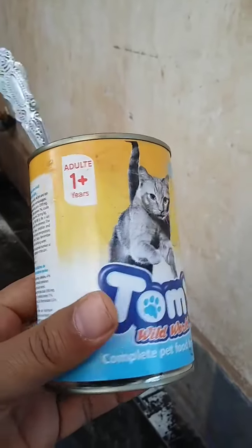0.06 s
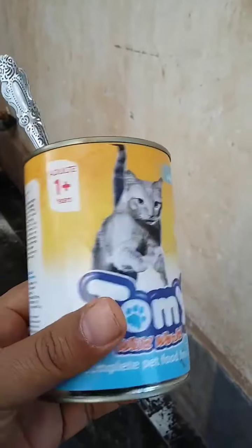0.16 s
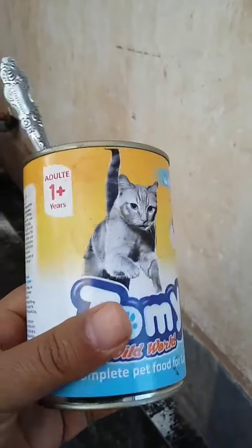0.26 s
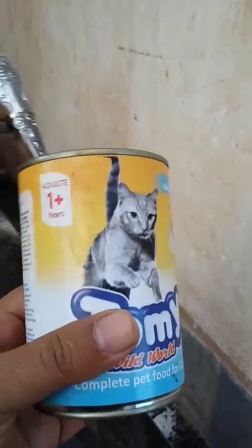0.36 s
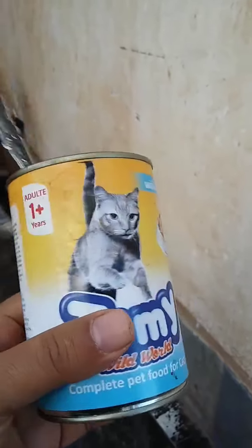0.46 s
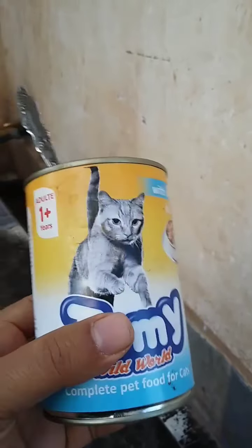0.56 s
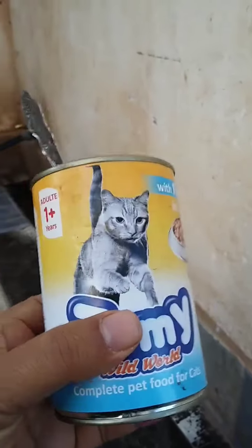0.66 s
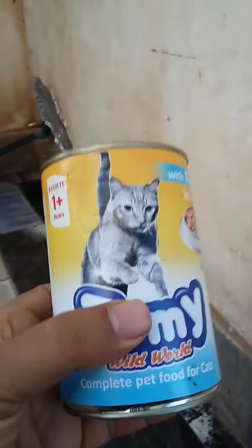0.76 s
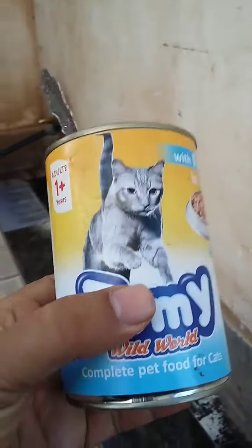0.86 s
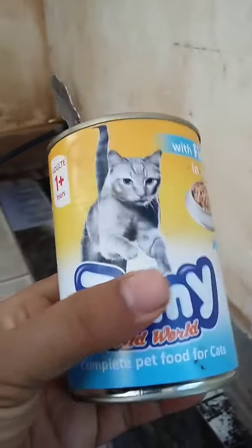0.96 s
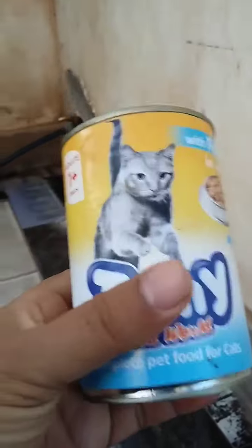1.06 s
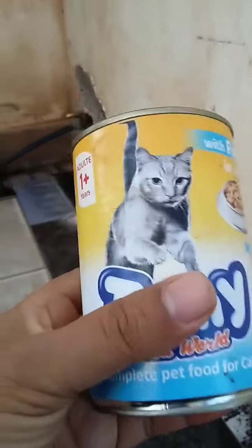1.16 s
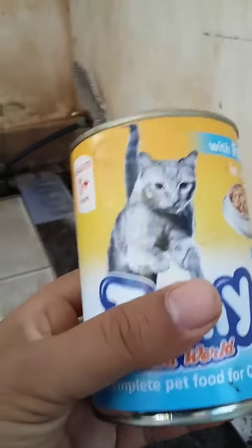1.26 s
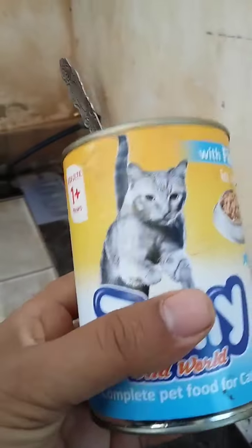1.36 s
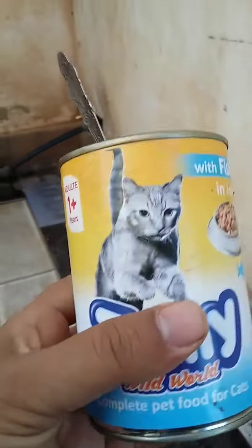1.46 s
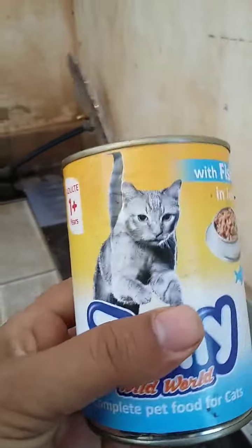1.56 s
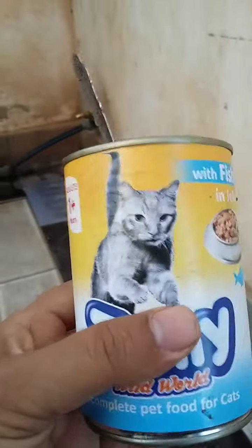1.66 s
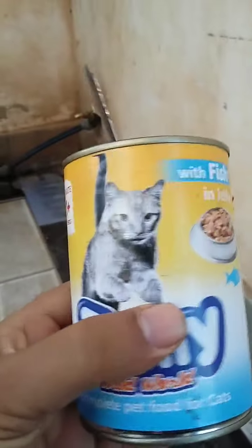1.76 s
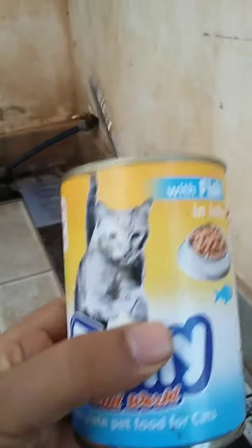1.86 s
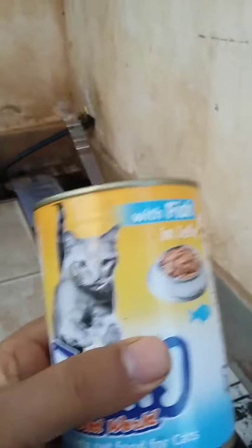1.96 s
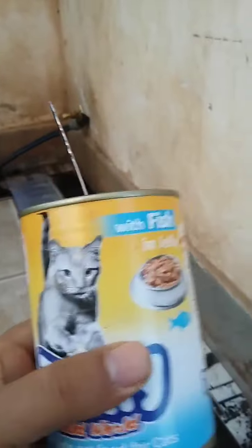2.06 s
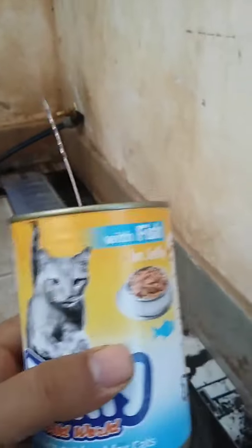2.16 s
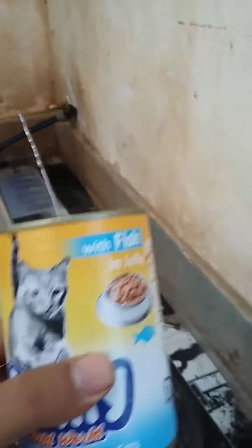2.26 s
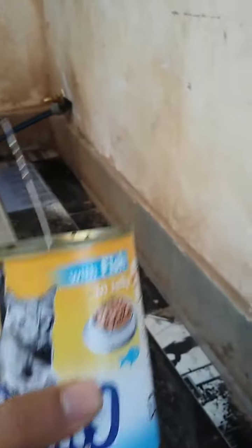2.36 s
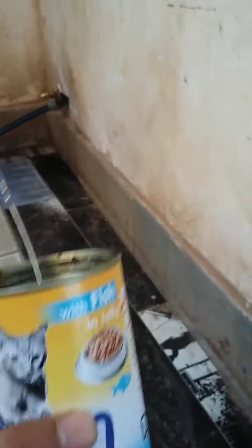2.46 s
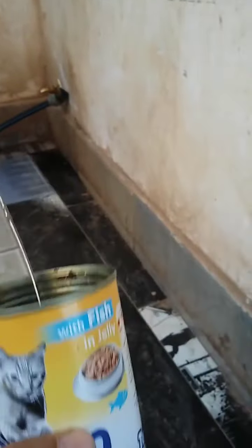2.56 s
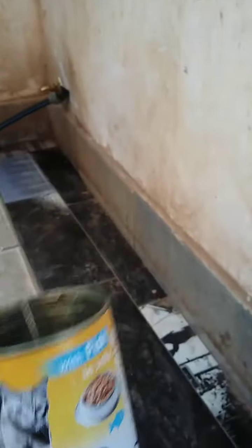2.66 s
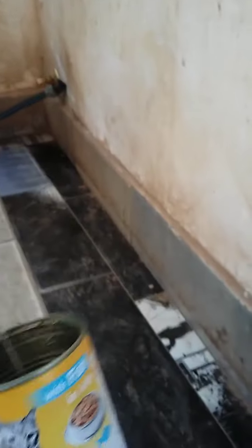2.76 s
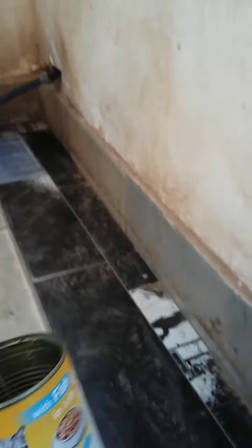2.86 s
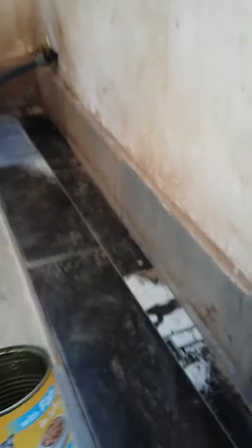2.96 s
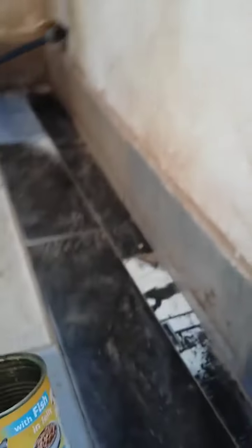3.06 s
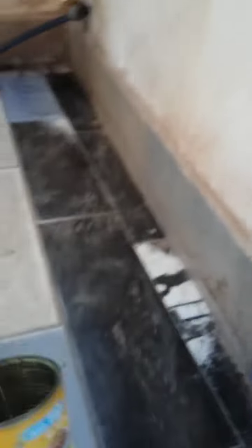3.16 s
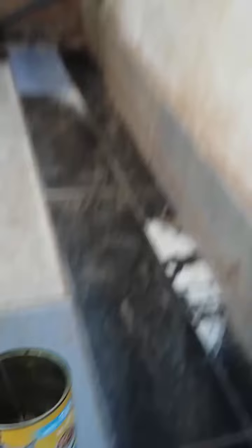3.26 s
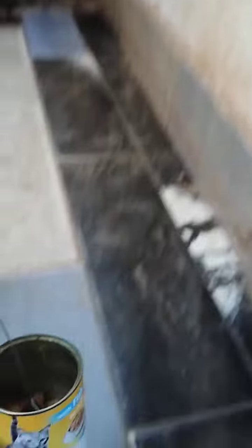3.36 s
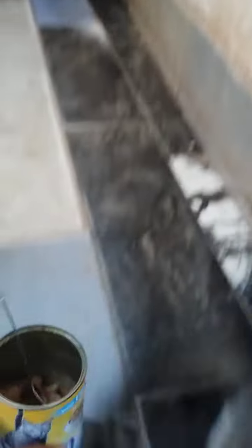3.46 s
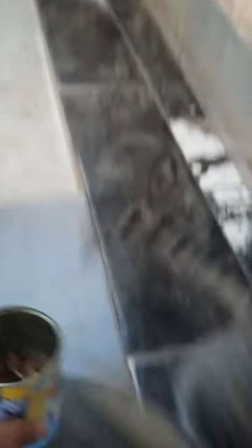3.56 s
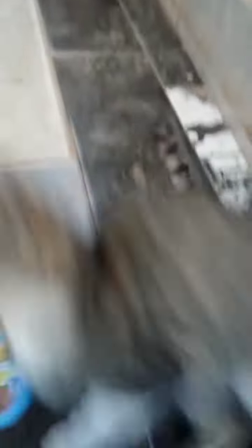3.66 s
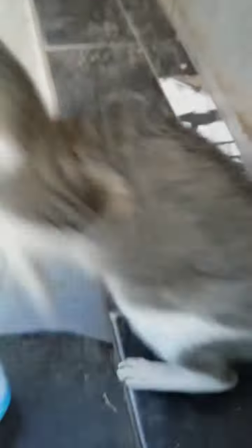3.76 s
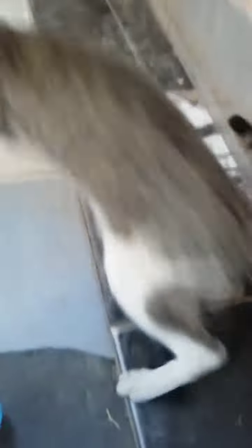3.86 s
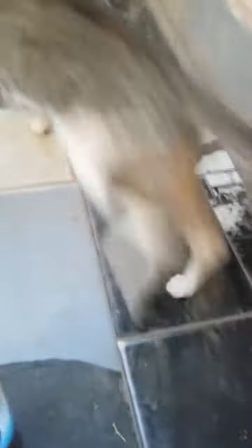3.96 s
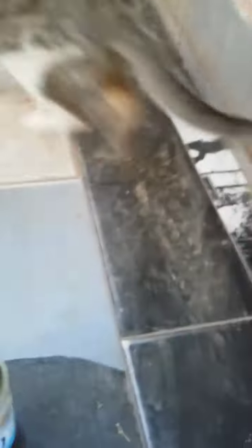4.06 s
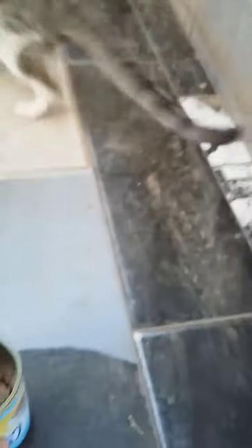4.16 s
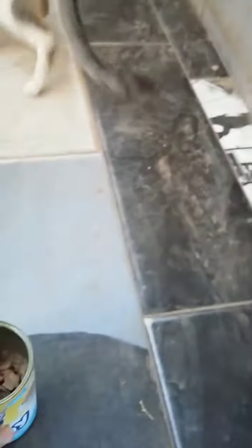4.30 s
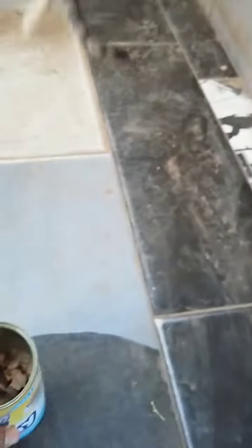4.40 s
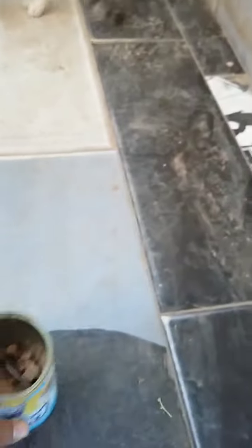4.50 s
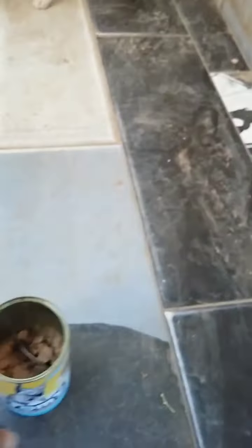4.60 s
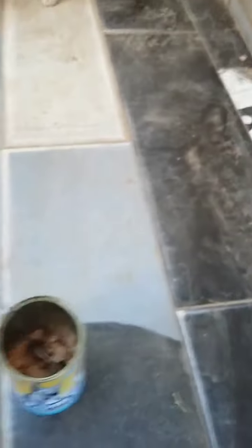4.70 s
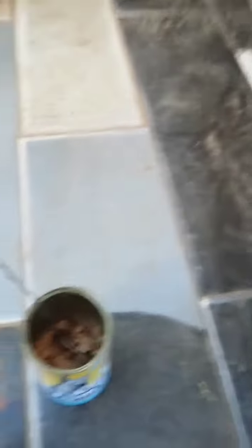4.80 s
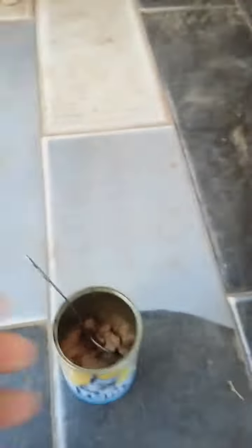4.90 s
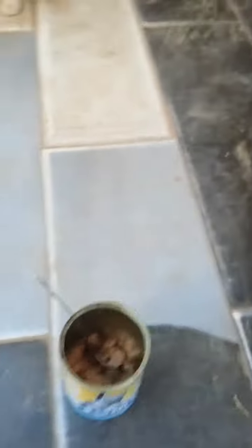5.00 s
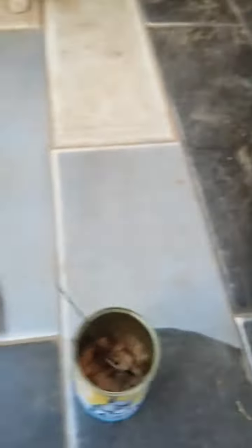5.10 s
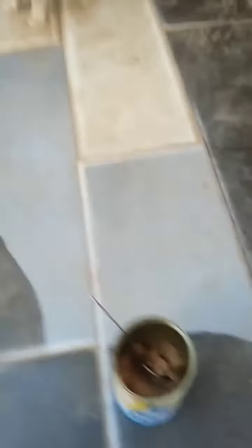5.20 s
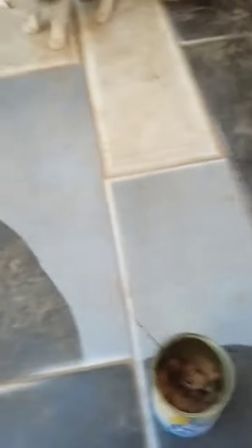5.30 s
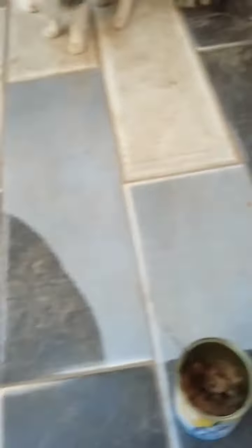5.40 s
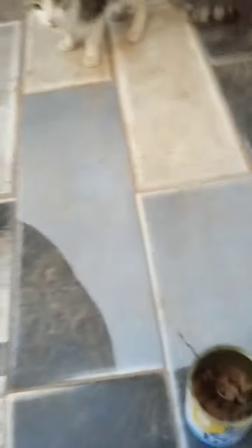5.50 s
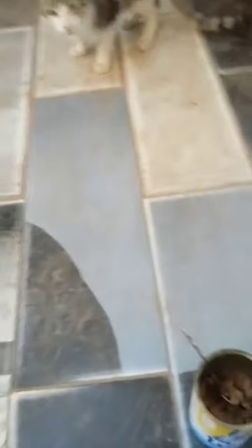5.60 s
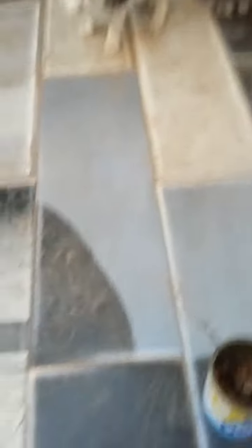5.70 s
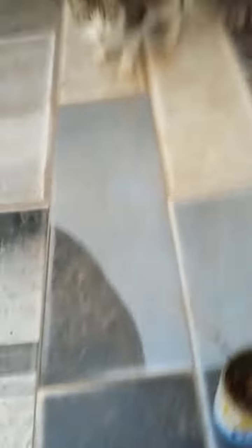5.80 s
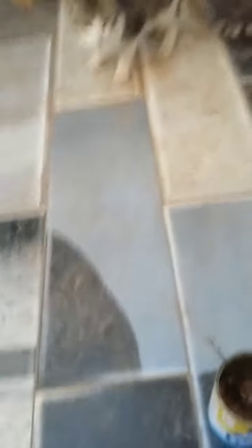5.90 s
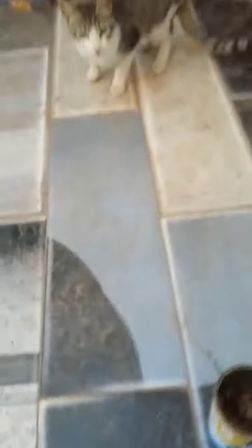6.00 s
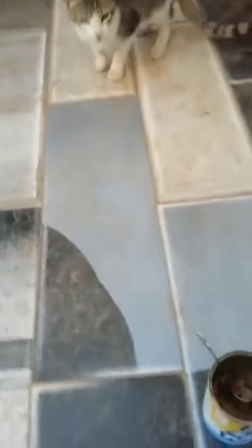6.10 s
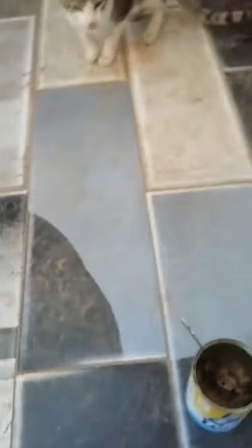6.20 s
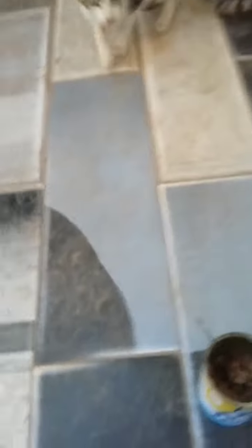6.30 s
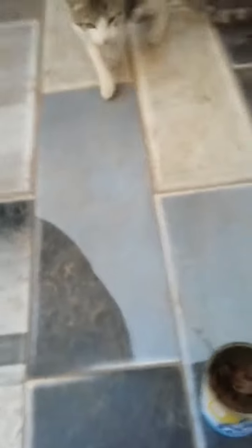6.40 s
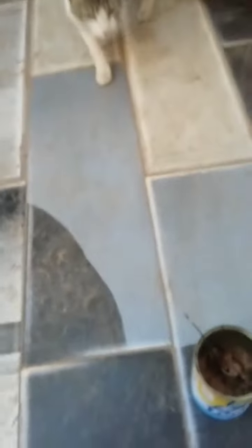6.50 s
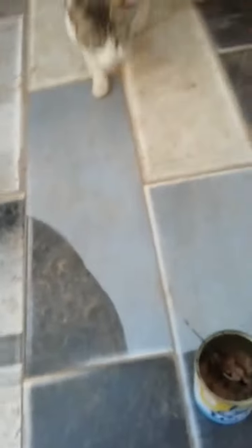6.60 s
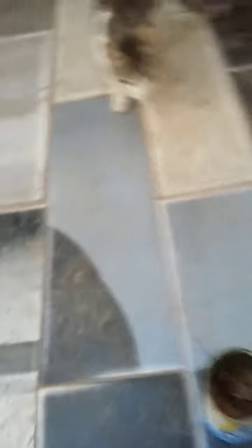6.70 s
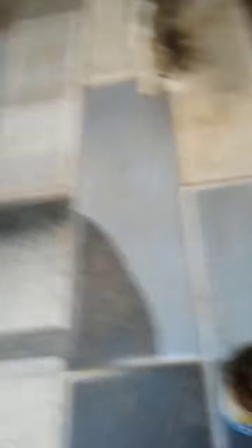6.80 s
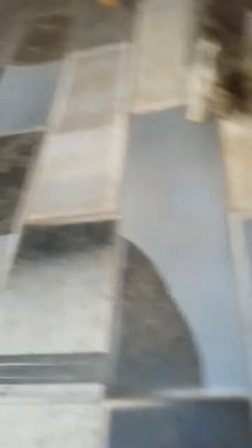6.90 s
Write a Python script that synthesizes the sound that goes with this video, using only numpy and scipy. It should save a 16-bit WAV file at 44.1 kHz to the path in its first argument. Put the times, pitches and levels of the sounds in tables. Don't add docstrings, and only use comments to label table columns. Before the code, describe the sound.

Songbirds whistle faintly over a low neighbourhood hum, then a spoon knocks in a food can, which lands on tile and scrapes briefly amid shuffling steps.

```python
import sys
import numpy as np
from scipy import signal
from scipy.fft import rfft, irfft, next_fast_len
from scipy.io import wavfile
from scipy.ndimage import uniform_filter1d, minimum_filter1d

SR = 44100
rng = np.random.default_rng(int(sys.argv[2]) if len(sys.argv) > 2 else 0)


def ratio(d):
    e = np.asarray(d, float) / 20
    return 10 ** e


def waveform_to_disk(signal):
    frames = np.transpose(np.atleast_2d(signal))
    scaled = np.clip(frames, -1, 1) * 32767
    samples = np.round(scaled).astype(np.int16)
    wavfile.write(sys.argv[1], SR, samples)


N = 306439

# time in seconds, drone level in dB.
DRONE_LEVEL = [(0.0, -56), (0.81, -54), (1.14, -57), (2.67, -57.5), (3.05, -53.5), (4.64, -53.5),
               (5.02, -53.5), (6.36, -53.5), (6.94, -52.5)]
# frequency in Hz, density in dB per Hz.
DRONE_SPECTRUM = [(12, -46), (20, -25), (22, -26), (48, 1), (65, 2), (134, 4.5), (157, -4), (195, -10),
                  (245, -15), (500, -22.5), (650, -65), (1100, -120)]
# frequency in Hz, density in dB per Hz.
WASH_SPECTRUM = [(120, -27), (200, 1), (294, -2.5), (538, -5), (836, -3.5), (2130, -12), (2380, -15),
                 (3130, -14), (3970, -14), (5130, -30.5), (7270, -35.5), (7970, -23.5), (8580, -37),
                 (11500, -34.5), (16000, -48)]
# frequency in Hz, width in Hz, level in dB over the drone.
HUM_MODES = [(79.9, 3.8, -6), (165.14, 10.5, -3.5), (233, 1.7, -23.5), (497, 5.4, -16)]
# time in seconds, level in dB.
HUM_SWELL_LEVEL = [(0.0, -73.5), (0.54, -69), (0.85, -58.5), (1.02, -66.5), (1.2, -69.5), (3.54, -61.5),
                   (3.86, -56.5), (4.7, -58), (5.28, -63), (6.94, -64.5)]
# frequency in Hz, left-right likeness from 0 to 1.
SIDE_LIKENESS = [(60, 1), (180, 0.88), (550, 0.92), (1650, 0.02), (4970, 0.012), (15000, 0.13)]
# frequency in Hz, left minus right in dB.
NOISE_LEAN = [(60, 1), (180, -2), (550, 0), (1650, -3.5), (4970, 2), (15000, -1.5)]
# start, rise, hold and fall in seconds, level in dB.
MURMUR_STROKES = [
    (6.862, .012, 0.04, .015, -56),
    (6.94, .015, .02, .02, -63),
]
# start and length in seconds, first and last pitch in Hz,
# level in dB.
HIGH_SONG = [(0.0081, 0.024, 3200, 3090, -72), (0.04, 0.045, 3460, 3800, -78),
             (0.079, 0.051, 3890, 3860, -73), (.085, 0.033, 3750, 3600, -77),
             (0.12, 0.044, 3600, 3420, -83), (0.217, 0.042, 3050, 2890, -74),
             (0.243, 0.064, 2940, 3210, -71), (0.275, 0.032, 3000, 2940, -68),
             (0.325, 0.064, 3330, 3150, -70.5), (0.377, 0.05, 3050, 2950, -74),
             (0.538, 0.056, 2540, 2600, -74), (0.624, 0.061, 2640, 2730, -73),
             (0.76, 0.097, 5080, 5040, -80), (0.757, 0.058, 4700, 4550, -74),
             (0.778, 0.02, 4020, 3920, -63), (0.808, .025, 3420, 3400, -67),
             (0.823, 0.02, 4100, 3920, -68), (.84, 0.038, 3100, 2950, -73),
             (0.858, 0.059, 3850, 3530, -74), (1.129, 0.046, 3600, 3370, -70),
             (1.162, 0.056, 3050, 3230, -70), (1.176, 0.037, 3570, 3330, -70),
             (1.231, 0.062, 3500, 3440, -72.5), (1.368, 0.096, 3560, 2540, -67.5),
             (1.382, 0.037, 3340, 3220, -64), (1.465, 0.22, 2550, 3066, -69.5),
             (1.504, 0.14, 3240, 3230, -75), (1.687, .05, 3076, 3040, -77),
             (1.858, 0.07, 4140, 4300, -70.5), (1.95, 0.06, 4600, 4750, -83),
             (2.017, 0.072, 4540, 4200, -71),
             (2.217, 0.039, 3550, 3670, -73), (2.251, 0.03, 3520, 3250, -64.5),
                  (2.28, 0.053, 3270, 3140, -66.5), (2.31, .03, 3180, 3330, -69),
                  (2.34, 0.052, 3390, 3750, -70), (2.406, 0.077, 3780, 3660, -63.5),
                  (2.49, 0.064, 3620, 3700, -70.5), (2.606, 0.046, 3040, 2940, -65),
                  (2.645, 0.057, 3340, 3200, -68), (2.668, 0.046, 3750, 3800, -75),
                  (2.785, 0.049, 3110, 3010, -59.5), (2.85, 0.043, 3000, 2900, -67),
                  (2.937, .03, 3300, 3230, -71), (2.96, 0.042, 4050, 4200, -68),
                  (3.055, 0.04, 3750, 3810, -67), (3.103, 0.037, 4050, 4240, -71),
                  (3.247, 0.051, 3260, 3150, -63), (4.143, 0.091, 4310, 4110, -67.5)]
# start and length in seconds, first and last pitch in Hz, level in dB.
FAR_SONG = [
    (0.179, 0.066, 2110, 2020, -63.5),
    (0.261, 0.071, 2014, 1930, -71),
    (0.38, 0.12, 1956, 2010, -70.5),
    (0.474, 0.12, 2035, 2100, -68.5),
    (1.069, 0.45, 1792, 1735, -69.5),
    (1.489, 0.18, 1750, 1710, -73),
    (2.3, 0.4, 2040, 2040, -80),
    (2.601, 0.061, 2050, 2060, -72),
]
# start, rise, hold and fall in seconds, level in dB.
CHORUS_SWELLS = [
    (.1, .5, 0.41, .7, -72),
    (1.5, .35, .05, .5, -76),
    (2.7, 0.65, 0.47, 0.49, -58),
]
# start, rise, hold and fall in seconds, level in dB.
BUZZ_STROKES = [
    (.765, 0.027, 0.047, 0.046, -78),
]
# frequency in Hz, density in dB per Hz.
RUB_SPECTRUM = [(180, -38.5), (310, -2.5), (453, -3.5), (872, -8.5), (1630, -8), (1830, -5), (2920, -1),
                (3600, -3), (4420, -8), (5100, -14), (5700, -21), (9000, -32.5), (11700, -71),
                (19800, -120)]
# frequency in Hz, density in dB per Hz.
SCUFF_SPECTRUM = [(2060, -31), (3000, -24), (3900, 2), (4770, -8), (5390, -10.5), (6620, -15.5),
                  (8340, -19), (12000, -16), (15300, -24), (16000, -50)]
# start, rise, hold and fall in seconds, level in dB.
RUB_STROKES = [(3.33, 0.15, 0.033, 0.1, -55), (3.43, .08, .04, 0.102, -55.5),
               (3.55, 0.18, 0.19, 0.0075, -51), (3.83, 0.13, 0.0052, 0.086, -48),
               (4.04, 0.051, 0.011, 0.035, -60), (4.14, 0.066, 0.39, 0.062, -64.5),
               (4.44, 0.052, 0.16, 0.066, -52.5), (4.86, 0.2, 0.024, 0.062, -46.5),
               (4.9, 0.035, 0.14, 0.057, -50), (5.18, 0.14, 0.025, 0.8, -54),
               (5.76, 0.045, 0.13, 0.18, -53.5), (6.05, 0.084, 0.13, .03, -63),
               (6.255, 0.038, 0.0078, 0.024, -55.5), (6.5, 0.26, 0.23, 0.041, -61.5),
               (6.77, 0.0086, 0.0054, 0.048, -51.5)]
# start, rise, hold and fall in seconds, level in dB.
SCUFF_STROKES = [(3.68, .3, 0.075, .03, -73.5), (3.8, .03, .05, 0.19, -72), (4.46, 0.066, .1, .05, -70),
                 (4.6, 0.011, 0.072, 0.033, -51.5), (4.76, .05, 0.13, 0.29, -70),
                 (5.721, 0.002, 0.0034, 0.0066, -46.5), (5.77, 0.02, 0.045, .05, -72.5),
                 (5.893, 0.015, 0.0056, 0.016, -53), (5.997, 0.002, 0.0039, 0.005, -49.5),
                 (6.005, 0.012, 0.094, 0.018, -62), (6.165, 0.026, 0.0039, 0.0037, -55.5),
                 (6.235, 0.031, 0.039, 0.025, -59.5), (6.57, 0.23, 0.019, 0.076, -68),
                 (6.76, 0.11, 0.058, 0.094, -68.5)]
# start, rise, hold and fall in seconds, level in dB.
SLIDE_STROKES = [
    (4.835, 0.068, 0.1, 0.15, -42.5),
    (5.0, 0.059, 0.018, 0.035, -54),
    (6.775, 0.025, 0.0063, 0.0099, -49),
    (6.87, .03, 0.08, .05, -64),
]
# frequency in Hz, density in dB per Hz.
SLIDE_SPECTRUM = [(450, -40), (650, 1.5), (900, 2.5), (1300, 1), (2000, -5), (3200, -6), (4000, -23)]
# time in seconds, peak in dB,
# pitch in Hz.
LOW_THUDS = [(2.042, -33, 150), (3.7114, -19, 190), (3.733, -25, 170), (3.78, -26.5, 159),
             (3.787, -27.5, 230), (3.813, -26, 190), (3.842, -31, 170), (4.044, -26, 127),
             (6.162, -24.5, 96), (6.19, -25, 72.7), (6.701, -31.5, 264), (6.781, -24, 77.4)]
# time in seconds, peak in dB, left minus right in dB, colour in Hz, T60 in seconds.
GRIT_TICKS = [(0.4726, -19.5, -9, 2530, 0.073), (1.355, -30, -9, 1800, .02), (1.572, -31, -7, 2100, 0.022),
              (1.774, -29, -7, 3060, 0.025), (1.839, -30, -13, 3300, .02), (2.211, -23.5, -7, 2600, 0.013),
              (2.797, -24, -7, 2300, 0.016), (2.8844, -22, 8, 2400, 0.016), (2.96, -38, 0, 2900, .02),
              (3.694, -20.5, -18, 3000, 0.28), (3.708, -26, -5, 4500, .012), (3.726, -19, -10, 3600, 0.045),
              (3.748, -22, 8, 5300, .06), (4.134, -28, -3, 2890, 0.031), (4.505, -31, -4, 6500, .02),
              (4.5427, -18, -15, 3500, 0.014), (4.57, -13, 3, 4700, 0.02), (4.586, -30, 0, 6000, .012),
              (5.7214, -22, -9, 3300, 0.014), (5.895, -20.5, -13, 2900, 0.013),
              (5.948, -24, 10, 4960, 0.11), (5.995, -20, -9, 3300, 0.022), (6.1625, -20, 5, 4070, 0.017),
              (6.204, -31, 5, 4070, 0.012), (6.255, -24, 0, 3970, .05), (6.445, -27, 0, 1200, 0.014),
              (6.528, -10, -3, 3580, 0.009), (6.684, -39, 0, 6500, 0.011), (6.764, -21, -8, 3800, .02),
              (6.773, -18, -7, 2900, 0.028), (6.778, -18, -8, 2200, 0.014), (6.79, -32, 2, 6500, .015),
              (6.803, -23, 6, 6000, .015), (6.818, -33, 0, 4500, .015)]
# time in seconds, peak in dB, left minus right in dB, top in Hz.
CLEAN_SNAPS = [
    (6.1852, -15, -19, 3800),
    (6.41, -39, -8, 1190),
    (6.6996, -29, -9, 1320),
    (6.7558, -34, -13, 900),
]
# time in seconds, peak in dB, lowest frequency in Hz, T60 in seconds.
HARD_EDGES = [
    (3.775, -44, 6000, .03),
    (3.787, -58, 6000, .04),
    (4.3995, -58, 5500, .025),
    (6.1845, -50, 8500, .012),
]
# start, rise, hold and fall in seconds, level in dB.
DRAG_STROKES = [
    (4.595, 0.0096, 0.094, 0.0099, -52.5),
    (4.622, 0.051, 0.03, 0.032, -46),
]
# frequency in Hz, width in Hz, left in dB, right in dB.
DRAG_MODES = [(510, 42, -8, -3), (923, 87, 2.5, 7), (1885, 120, -1.5, 3), (2240, 95, -5, 1),
              (2710, 180, -24, 6.5), (3130, 190, -6, 5), (4070, 23, 5, -25), (4430, 150, -7, 2),
              (4820, 76, 5.5, 4.5), (5080, 62, -0.5, -21), (6700, 1100, -34, -2), (13500, 17000, -20, -7)]
# time in seconds, peak in dB.
SPOON_HITS = [
    (3.7750, -17),
    (3.7762, -14.5),
    (3.7780, -19.5),
    (3.7825, -28),
    (3.7865, -25.5),
    (3.7892, -21),
    (3.7925, -39),
    (3.8005, -41),
    (3.816, -40),
    (3.9144, -48.5),
]
# frequency in Hz, level in dB, T60 in seconds.
WALL_MODES = [(246.6, -30.5, 0.35), (484, -23.5, 0.033), (765, -10.5, 0.014), (1460, -12, 0.036),
              (2100, -14, 0.031), (2810, -21, 0.032), (2780, 3, 0.026), (3050, -3, 0.012),
              (3250, -2.5, 0.018), (3400, -21, 0.034), (3780, -27, 0.024), (4370, -32, 0.018),
              (4660, -27, 0.03), (4750, -2.5, 0.017), (5000, -4.5, 0.016), (5100, -22, 0.02),
              (5830, -9, 0.028), (6860, -24, 0.011)]
# time in seconds, peak in dB.
BASE_HITS = [
    (4.3991, -13),
    (4.4000, -13.5),
    (4.4009, -12.5),
    (4.4030, -18.5),
    (4.4095, -53),
]
# frequency in Hz, level in dB, T60 in seconds.
BASE_MODES = [(657, -21, 0.038), (820, -41, 0.014), (1060, -8.5, 0.0037), (1540, -14, 0.0098),
              (1800, -9.5, 0.012), (2530, -10.5, 0.013), (3650, -21, 0.01), (4600, -32, 0.023),
              (4940, -14, 0.034)]
# frequency in Hz, left minus right in dB.
CAN_MODE_LEAN = [(240, -4), (950, -4), (1900, -8), (2800, -12), (3600, -9), (4600, 2), (7500, 0)]

LEFT_LAG = 12


def in_time(rows):
    s, *columns = np.transpose(rows)
    return [np.interp(np.arange(N) / SR, s, c) for c in columns]


def at_hz(points, hz):
    point_hz, value = np.array(points).T
    return np.interp(np.log(hz), np.log(point_hz + 1), value)


def rms_one(x):
    return x / np.sqrt(np.mean(x ** 2) + 1e-20)


def drift(rate):
    r = np.exp(-80 * np.pi * rate / SR)
    slow = signal.lfilter([1], [1, -2 * r, r * r], rng.standard_normal(N // 40 + 2002))[2000:]
    return np.interp(np.arange(N) / 40, np.arange(len(slow)), rms_one(slow))


def pan(left_minus_right_db):
    return ratio(left_minus_right_db / 2 * np.array([[1], [-1]]))


def resonate(x, hz, width_hz):
    r = np.exp(-np.pi * width_hz / SR)
    zeros = np.array([1, 0, -1]) * (1 - r * r) / 2
    return signal.lfilter(zeros, [1, -2 * r * np.cos(2 * np.pi * hz / SR), r * r], x)


def coloured(spectrum, patchy_db, lean_db, alike_share):
    lowest_hz, highest_hz = spectrum[0][0], spectrum[-1][0]
    hz = np.maximum(np.fft.rfftfreq(N, 1 / SR), 1)
    alike = np.clip(alike_share * at_hz(SIDE_LIKENESS, hz), 0, .88)
    in_band = (hz > lowest_hz) * (hz < highest_hz)
    mid, side = rfft(rng.standard_normal((2, N))) * ratio(at_hz(spectrum, hz)) * in_band
    pair = np.sqrt(1 + alike) * mid + np.sqrt(1 - alike) * side * np.array([[1], [-1]])
    pair = pair * pan(at_hz(NOISE_LEAN, hz) + lean_db)
    out, together = 0, drift(8)
    for octave in range(4, 15):
        share = np.clip(1 - np.abs(np.log2(hz) - octave), 0, 1)
        if lowest_hz / 2 < 2 ** octave < highest_hz * 2:
            flicker = ratio(patchy_db * (.5 * together + drift(31.0)))
            out = out + irfft(pair * share, N) * flicker
    return out / np.sqrt(np.mean(out.mean(axis=0) ** 2))


def strokes(rows):
    t, power = np.arange(N) / SR, 0
    for s, rise, hold, fall, db in rows:
        outside = np.maximum(0, np.maximum((s - t) / rise, (t - s - hold) / fall))
        power = power + ratio(db - 12 * outside) ** 2
    return np.sqrt(power)


def yard(x):
    t60_s, wall_cut_hz = 0.2, 5300
    size = next_fast_len(N + SR)
    hz = np.fft.rfftfreq(size, 1 / SR)
    answer = np.zeros((2, len(hz)), complex)
    for k, lag in enumerate(rng.uniform(0.0074, 0.038, 12)):
        loop = ratio(-60 * lag / t60_s) / (1 + 1j * hz / wall_cut_hz) * np.exp(-2j * np.pi * hz * lag)
        answer[k % 2] += (-1) ** (k // 2) * loop / (1 - loop)
    return irfft(rfft(x, size) * answer, size)[:, :N]


def neighbourhood():
    drone_db, = in_time(DRONE_LEVEL)
    swell_db, = in_time(HUM_SWELL_LEVEL)
    swing_db = drone_db - drone_db.mean()
    hums = []
    for hz, width, db in HUM_MODES:
        noise = rng.standard_normal(N)
        hums.append(ratio(db) * rms_one(resonate(resonate(noise, hz, width), hz, width)))
    hum = hums[0] + sum(hums[1:]) * ratio(swell_db - swell_db.mean() - 1.57 * swing_db)
    drone = coloured(DRONE_SPECTRUM, patchy_db=-1.0, lean_db=-0.6, alike_share=1.0)
    drone = drone + hum * pan(-2.2) * ratio(0.49 * swing_db)
    wash = coloured(WASH_SPECTRUM, patchy_db=-1.14, lean_db=0.2, alike_share=0.66)
    wash = ratio(-58.5 + 0.47 * swing_db) * wash
    return ratio(drone_db - 1.6) * drone + wash


def murmur():
    hollow = resonate(resonate(rng.standard_normal(N), 710, 220), 720, 220)
    return strokes(MURMUR_STROKES) * rms_one(hollow)


def chorus():
    out, t = np.zeros(N + SR), np.arange(SR // 20) / SR
    for s, pitch, glide, size in rng.random((2400, 4)):
        phase = 2 * np.pi * (2600 * 1.6 ** pitch) * (t + 3 * (glide - .6) * t ** 2)
        i = int(s * N)
        out[i:i + len(t)] += ratio(3 * size) * np.hanning(len(t)) * np.sin(phase)
    out = rms_one(0.35 * out[:N] + yard(out[:N]))
    return ratio(-5.5) * strokes(CHORUS_SWELLS) * out


def buzz():
    breathy = rng.standard_normal((2, N))
    throat = sum(rms_one(resonate(resonate(breathy, hz, 900), hz, 900)) for hz in (3500, 4100, 4900))
    return strokes(BUZZ_STROKES) * throat


def birds():
    edge_s, peak_at = 0.0081, 0.15
    out, waver = np.zeros(N), 1 + .011 * drift(80)
    for s, length, first_hz, last_hz, level_db in HIGH_SONG + FAR_SONG:
        i = round((s - edge_s) * SR)
        t = np.arange(round((length + 2 * edge_s) * SR)) / SR - edge_s
        done = np.clip(t / length, 0, 1)
        hz = last_hz + (first_hz - last_hz) * (1 - done) ** 1.4
        sag = np.maximum((peak_at - done) / peak_at, (done - peak_at) / (1 - peak_at))
        edge = np.clip(np.minimum(t, length - t) / edge_s + 1, 0, 1)
        phase = 2 * np.pi * np.cumsum(hz * waver[i:i + len(t)]) / SR
        out[i:i + len(t)] += edge * ratio(level_db + 5.5 - 2 * sag) * np.sin(phase)
    out *= ratio(3 * drift(150) + .5)
    return ratio(-2.5) * out + ratio(-4) * yard(out)


def shuffling():
    dull = coloured(RUB_SPECTRUM, patchy_db=0.2, lean_db=-3.5, alike_share=0.57)
    bright = coloured(SCUFF_SPECTRUM, patchy_db=1.5, lean_db=4.5, alike_share=0.34)
    rubbed = strokes(RUB_STROKES) * dull + strokes(SCUFF_STROKES) * bright
    return ratio(1.0 * drift(49) + 0.52 * drift(250)) * rubbed


def slides():
    rub = coloured(SLIDE_SPECTRUM, patchy_db=4.5, lean_db=-2.0, alike_share=0.52)
    return strokes(SLIDE_STROKES) * ratio(-5.5 + 0.62 * drift(90)) * rub


def thuds():
    out, t = np.zeros(N), np.arange(SR // 8) / SR
    for s, peak_db, hz in LOW_THUDS:
        i = round(s * SR)
        decay = ratio(peak_db - 4.5 - 60 * t / 0.019)
        out[i:i + len(t)] += decay * np.sin(2 * np.pi * hz * t) * (1 - np.exp(-t / 0.00039))
    return out


def ticks():
    out, t = np.zeros((2, N)), np.arange(SR // 10) / SR
    for s, peak_db, pan_db, hz, t60 in GRIT_TICKS:
        noise = rng.standard_normal(len(t) + 12)
        noise[40] += 6
        puff = np.array([noise[8:-4], noise[12:]])
        puff = puff * ratio(-60 * t / max(t60, .003)) * (1 - np.exp(-t / 0.00064))
        edge = resonate(np.diff(puff, prepend=0), 9000, 9000)
        body = resonate(resonate(resonate(puff, hz, .8 * hz), hz, 1.3 * hz), hz, 1.3 * hz)
        puff = body + ratio(-43) * edge
        i = round(s * SR)
        out[:, i:i + len(t)] += ratio(peak_db - 23.5) * puff / np.abs(puff).max() * pan(pan_db)
    return out


def snaps():
    out, t = np.zeros((2, N)), np.arange(SR // 20) / SR
    for s, peak_db, pan_db, top_hz in CLEAN_SNAPS:
        push = ratio(-23) * rng.standard_normal((2, len(t))) * ratio(-60 * t / .015) * (t > .0006)
        push[0, LEFT_LAG] += 1
        push[1, 0] += 1
        band = signal.butter(2, [120, top_hz], "band", fs=SR, output="sos")
        push = signal.sosfilt(band, push) + ratio(-44) * push
        i = round(s * SR)
        out[:, i:i + len(t)] += ratio(peak_db - 4.5) * push / np.abs(push).max() * pan(pan_db)
    return out


def cracks():
    out, t = np.zeros((2, N)), np.arange(SR // 10) / SR
    for s, peak_db, low_hz, t60 in HARD_EDGES:
        burst = rng.standard_normal((2, len(t))) * ratio(peak_db - 60 * t / t60)
        band = signal.butter(3, [low_hz, 12500], "band", fs=SR, output="sos")
        i = round(s * SR)
        out[:, i:i + len(t)] += signal.sosfilt(band, burst)
    return out


def drag():
    caught = rng.random(N) < 5000. / SR
    grains = caught * ratio(4.5 * np.minimum(rng.exponential(1, N), 4)) * rng.choice([-1, 1], N)
    grains = np.array([np.roll(grains, 7), grains]) + 0.78 * rng.standard_normal((2, N))
    body = 0
    for k, (hz, width, left_db, right_db) in enumerate(DRAG_MODES):
        ring = rms_one(resonate(grains, hz, width))
        body = body + ratio([[left_db], [right_db]]) * (-1) ** k * ring
    return strokes(DRAG_STROKES) * ratio(0.56 * drift(110)) * body


def shiver():
    t = np.maximum(np.arange(N) / SR - SPOON_HITS[0][0], 0)
    rattle = rng.standard_normal((2, N)) * (t > 0) * ratio(-16 - 60 * t / .13 + 2 * drift(200))
    main = resonate(resonate(rattle, 2900, 720), 3800, 1300)
    upper = resonate(resonate(rattle, 5330, 740), 4200, 1100)
    low = resonate(rattle, 700, 700)
    top = resonate(resonate(rattle, 6400, 1800), 6400, 1800)
    return (main + ratio(-1.0) * upper + ratio(-27) * low + ratio(-33) * top) * pan(-6.2)


def strike(hits, modes, spread_db, low_hz, contact_hz, firm_count, lag):
    hit_s, hit_db = np.array(hits).T
    out, start = np.zeros((2, N)), round(hits[0][0] * SR) - 8
    at = np.round(hit_s * SR).astype(int) - start
    for hz, level_db, t60 in modes:
        clicks = np.full(SR // 2, 1e-18)
        clicks[at] = ratio(hit_db + level_db + spread_db * rng.normal(0, 1, len(at)))
        sign = rng.choice([-1, 1], len(at))[firm_count:]
        clicks[at[firm_count:]] *= sign * ratio(-2.5 * (hz / 3000) ** 2 + 2.5)
        r, w = ratio(-60 / (t60 * SR)), 2 * np.pi * hz / SR
        ring = signal.lfilter([0, np.sin(w)], [1, -2 * r * np.cos(w), r * r], clicks)
        lean_db = at_hz(CAN_MODE_LEAN, hz) / 2
        out[0, start + lag:start + lag + SR // 2] += ratio(lean_db) * ring
        out[1, start:start + SR // 2] += ratio(-lean_db) * ring
    out = signal.sosfilt(signal.butter(6, contact_hz, fs=SR, output="sos"), out)
    return signal.sosfilt(signal.butter(2, low_hz, "high", fs=SR, output="sos"), out)


def tin_can():
    knock = strike(SPOON_HITS, WALL_MODES, spread_db=1.5, low_hz=150, contact_hz=6800, firm_count=2, lag=LEFT_LAG)
    knock = knock - .45 * resonate(knock, 1100, 500)
    return knock + strike(BASE_HITS, BASE_MODES, spread_db=1.5, low_hz=500, contact_hz=4800, firm_count=3, lag=4)


def scene():
    background = neighbourhood() + murmur() + chorus() + buzz() + birds()
    near = thuds() + ticks() + snaps() + cracks() + drag() + shiver() + tin_can()
    return background + shuffling() + slides() + near + ratio(-16.0) * yard(near.mean(axis=0))


def roll_off(x):
    return signal.sosfilt(signal.butter(12, 15750, fs=SR, output="sos"), x)


def record(dry):
    dry = signal.sosfilt(signal.butter(3, 42, "high", fs=SR, output="sos"), dry)
    dry = dry - resonate(dry, 7950, 860)
    peak = np.abs(dry).max(axis=0) + 1e-9
    room_left = minimum_filter1d(np.minimum(1, .82 / peak), size=81)
    mix = dry * uniform_filter1d(room_left, size=81)
    return roll_off(mix)


dry = scene()
out = record(dry)
waveform_to_disk(out)
```